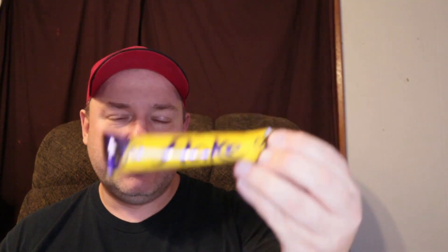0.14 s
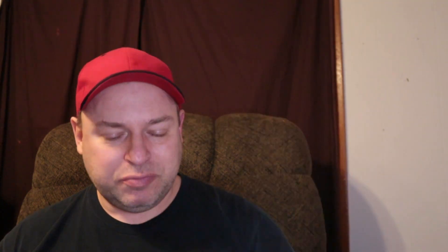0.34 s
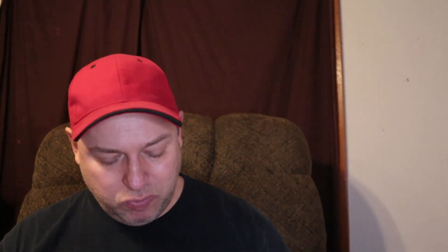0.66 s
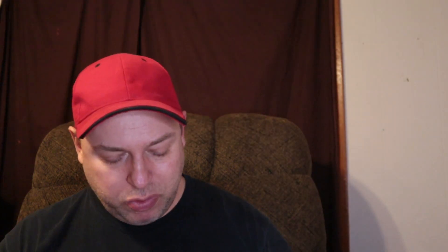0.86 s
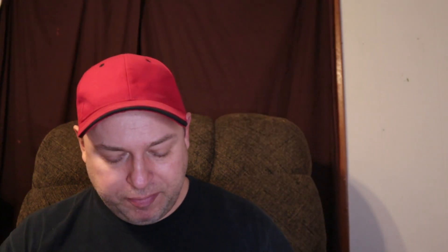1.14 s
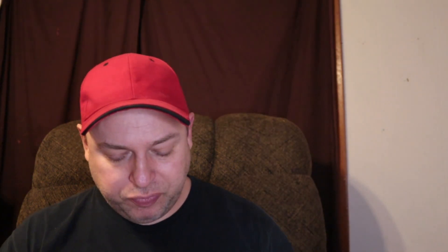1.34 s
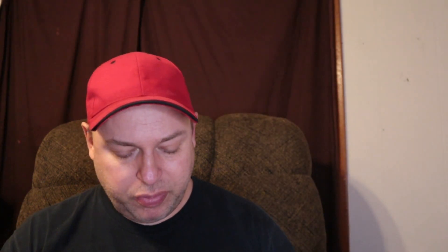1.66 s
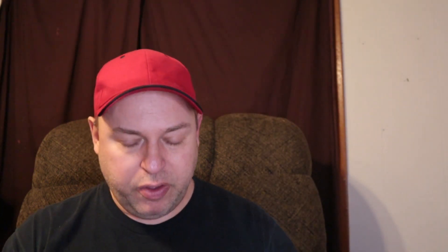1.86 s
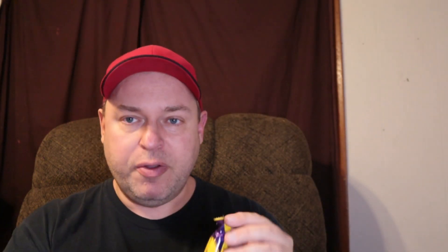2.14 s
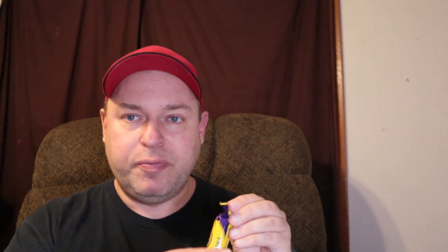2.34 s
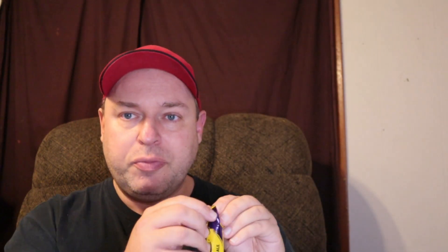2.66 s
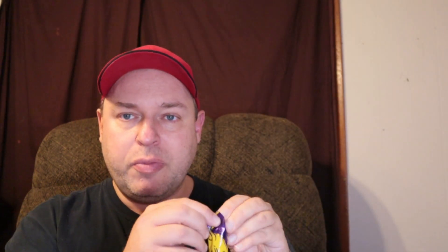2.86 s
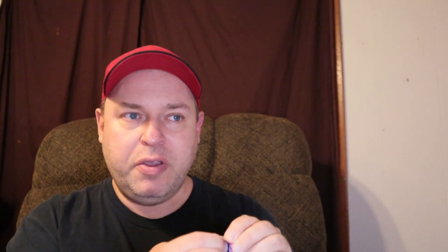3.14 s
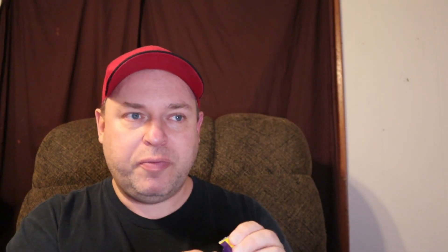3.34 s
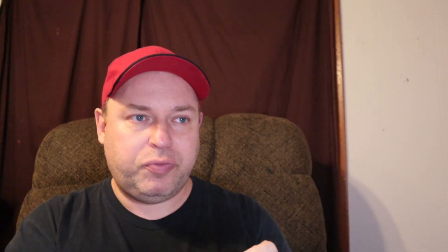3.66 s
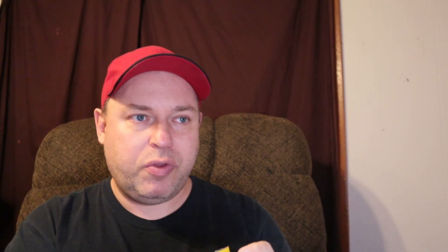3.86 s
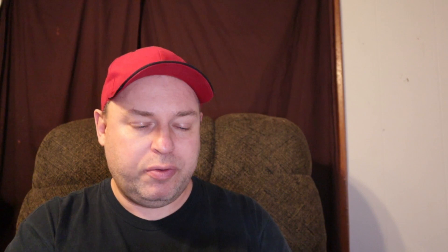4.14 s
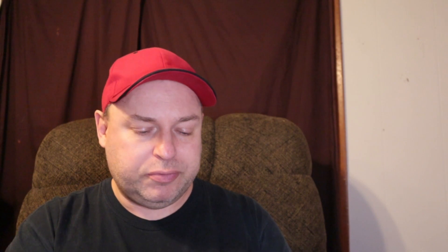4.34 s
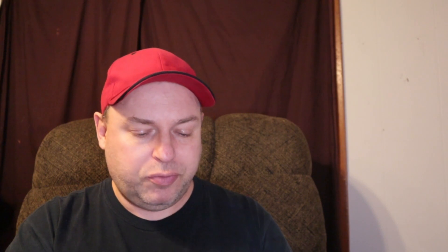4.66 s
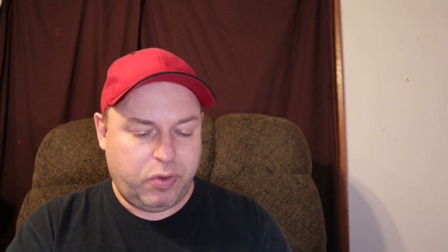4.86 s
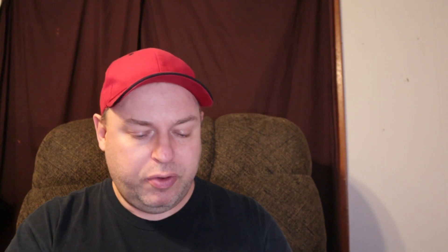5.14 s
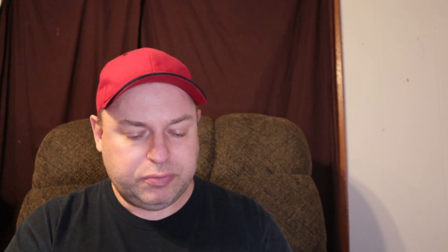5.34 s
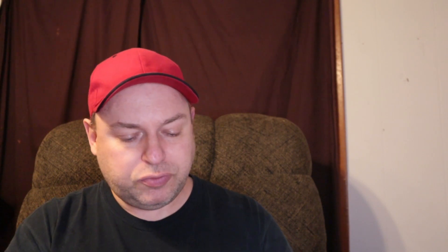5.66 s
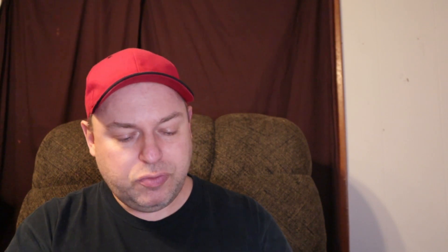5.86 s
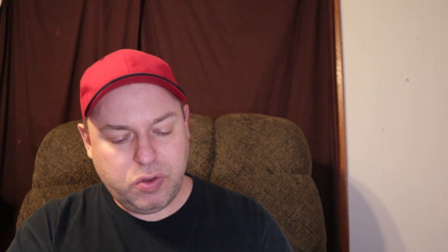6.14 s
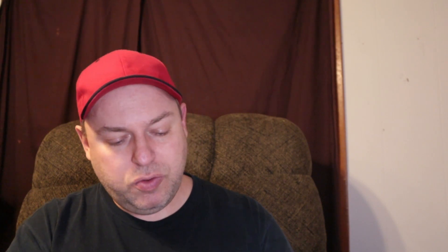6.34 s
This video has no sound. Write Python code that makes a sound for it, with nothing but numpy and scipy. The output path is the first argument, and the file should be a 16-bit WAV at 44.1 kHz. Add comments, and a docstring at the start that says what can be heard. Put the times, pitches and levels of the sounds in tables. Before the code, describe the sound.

Close, crisp crackling and rustling of a candy bar wrapper being opened by hand, over a soft appliance hum.

```python
"""Candy wrapper, close up

A thin plastic wrapper is worked open by hand near a stereo microphone in a quiet furnished room.
Creases buckle as lone snaps over tiny crackles and the hiss of sliding fingers; close surfaces and
walls echo them. Behind, over soft room rumble, an appliance's hum beats with two slower motor tones."""
import sys
import numpy as np
from scipy import signal
from scipy.fft import rfft, irfft, next_fast_len
from scipy.io import wavfile

SR = 44100
rng = np.random.default_rng(int(sys.argv[2]) if len(sys.argv) > 2 else 0)


def persist_wave(psi):
    """Save psi, clipped to +-1, as 16-bit WAV."""
    counts = np.round(np.clip(psi, -1, 1) * 32767).astype(np.int16)
    wavfile.write(sys.argv[1], SR, np.atleast_2d(counts).T)


N = 286771

# how alike both ports hear the rubbing and the wall echoes: (frequency [Hz], correlation [-1..1])
SCATTER_LIKENESS = [(1000, 1), (2500, 0.33), (6000, -0.5), (12000, -0.61)]


def from_db(db):
    return 10 ** (np.asarray(db) / 20)


def unit_rms(x):
    return x / np.sqrt(np.mean(x ** 2) + 1e-20)


def at_hz(points, hz):
    """Read a table along log frequency."""
    table_hz, values = np.transpose(points)
    return np.interp(np.log(hz), np.log(table_hz), values)


def band_noise(hz, width_hz, shape):
    """A narrow band of noise around one pitch; rms 1."""
    band = signal.butter(1, [hz - width_hz / 2, hz + width_hz / 2], "band", fs=SR, output="sos")
    return unit_rms(signal.sosfilt(band, rng.standard_normal(shape)))


def diffuse_noise(spectrum, size, likeness):
    """Noise reaching the microphone from all sides, with a given left-right likeness; rms 1."""
    hz = np.maximum(np.arange(size // 2 + 1) * SR / size, 10)
    mid, side = rfft(rng.standard_normal((2, size)))
    alike = np.clip(at_hz(likeness, hz), -1, 1)
    pair = np.sqrt(1 + alike) * mid + np.sqrt(1 - alike) * side * [[1], [-1]]
    return unit_rms(irfft(pair * from_db(at_hz(spectrum, hz)), size))


def room_tone():
    """The quiet room itself: soft rumble and faint hiss all around the microphone."""
    # spectrum of the room's air: (frequency [Hz], relative density [dB])
    spectrum = [(15, -9), (40, -22.5), (60, -10.5), (100, -14.5), (160, -16.5), (400, -16.5), (750, -21.5),
                (1400, -24.5), (2800, -28), (6000, -37.5), (10000, -53), (14000, -65)]
    # how alike both ports hear it: (frequency [Hz], correlation [-1..1])
    likeness = [(60, 1), (130, 0.91), (290, 0.65), (640, 0.044), (1400, -0.43), (6800, -0.84), (15000, 1)]
    return from_db(-53.5) * diffuse_noise(spectrum, next_fast_len(N), likeness)[:, :N]


def appliance_hum():
    """A tone at twice the mains rate beats with two slower motor tones under wavering overtones."""
    # steady mains and motor tones: (frequency [Hz], rms level [dB], phase [rad])
    tones = [(119.99, -60.4, .16), (117.51, -68.8, 1.87), (115.45, -68.6, 2.5)]
    # overtones, as narrow bands of noise: (frequency [Hz], width [Hz], rms level [dB])
    overtones = [(236.1, 9, -65), (470.6, 15, -68.5)]
    t = np.arange(N) / SR
    hum = sum(np.sqrt(2) * from_db(db) * np.sin(2 * np.pi * hz * t + phase) for hz, db, phase in tones)
    return hum + sum(from_db(db) * band_noise(hz, width, N) for hz, width, db in overtones)


def handling_db(times):
    """How hard the hands work the film: squeezes rise fast, hold and let go over a light rustle."""
    # fingers crunch the film: (time at full strength [s], hold [s], handling level [dB])
    squeezes = [(1.002, 0.064, -43.5), (1.058, 0.021, -39.5), (1.22, 0.012, -45), (1.52, 0.11, -45.5),
                (2.069, 0.0093, -30), (2.21, 0.042, -33.5), (2.428, 0.0049, -38), (2.75, 0.11, -44.5),
                (3.19, 0.063, -45.5), (3.384, 0.051, -32), (3.55, 0.0094, -35.5), (3.87, 0.027, -43.5),
                (4.061, 0.056, -39.5), (4.207, 0.11, -39), (4.52, 0.014, -42), (4.802, 0.076, -36.5),
                (4.902, 0.078, -34.5), (5.1, 0.02, -35.5), (5.328, 0.13, -34.5), (5.52, 0.026, -34.5),
                (5.68, 0.027, -41), (5.83, 0.066, -46.5), (6.133, 0.011, -45.5), (6.164, 0.025, -38),
                (6.317, 0.17, -40.5)]
    # light rustle between squeezes: (time [s], handling level [dB])
    rustle = [(0.0, -67.5), (1.0, -51), (1.5, -51), (1.8, -58.5), (2.3, -48.5), (2.7, -49), (3.0, -55.5),
              (3.6, -45), (4.3, -49), (4.48, -57.5), (4.7, -48), (5.05, -56), (5.3, -57.5), (5.6, -45),
              (6.1, -59), (6.5, -37.5)]
    rise_db_per_s, fall_db_per_s = 1195, 371
    start, hold, db = np.transpose(squeezes)[..., None]
    early, late = np.maximum(start - times, 0), np.maximum(times - start - hold, 0)
    squeeze_db = db - rise_db_per_s * early - fall_db_per_s * late
    return np.maximum(squeeze_db.max(axis=0), np.interp(times, *np.transpose(rustle)))


def finger_rub():
    """Fingers slide on the film: a soft papery hiss that swells with the handling."""
    # spectrum of the friction: (frequency [Hz], relative density [dB])
    spectrum = [(500, -19), (1200, 2.5), (2700, 9), (5000, 6.5), (9000, 3.5), (13000, -10)]
    coarse_t = np.arange(0, N + 64, 64) / SR
    level_db = np.interp(np.arange(N) / SR, coarse_t, handling_db(coarse_t)) - 5
    return from_db(level_db) * diffuse_noise(spectrum, next_fast_len(N), SCATTER_LIKENESS)[:, :N]


def buckle(times, peak_db, fold_hz, fold_q, boom_db, spread_db, detune):
    """A buckling crease kicks each patch of film differently; the crumpled shape shifts their tuning."""
    # patches of film that ring: (frequency [Hz], relative level [dB], time to fall 60 dB [s])
    patches = [(480, -16, .011), (1100, -2, .012), (1450, -2, .009), (1850, 1, .006), (2700, -1, .003),
               (3900, 1, .0022), (5300, -1, .0016), (7500, 0, .0015), (10500, 2, .001)]
    hz, patch_db, t60 = np.transpose(patches)
    low = hz < 1500   # low patches boom, the rest crack
    scatter = rng.standard_normal((len(times), 2, len(patches)))
    kick = from_db(patch_db + spread_db * scatter[:, 0])
    kick[:, 0] *= from_db(.8 * (boom_db + 14))   # a heavy boom is also a deep one
    tuned_hz = hz * np.exp(detune * scatter[:, 1])
    t = np.arange(640) / SR
    rings = np.sin(2 * np.pi * tuned_hz[..., None] * t) * from_db(-60 * t / t60[:, None])
    crack, boom = (np.einsum("em,emt->et", kick * part, rings) for part in (~low, low))
    # the fold is a resonator of its own pitch and radiates little below it
    bins_hz = (np.arange(len(t) // 2 + 1) + 1e-3) * SR / len(t)
    ratio = 1j * bins_hz / fold_hz[:, None]
    fold = ratio / (1 + ratio) / (1 + fold_q[:, None] * (ratio + 1 / ratio))
    crack = irfft(rfft(crack) * fold)
    boom *= (from_db(boom_db) * crack.std(axis=1) / boom.std(axis=1))[:, None]
    pops = (crack + boom) * from_db(peak_db)[:, None] / abs(crack).max(axis=1, keepdims=True)
    return place_with_echoes(times, pops)


def place_with_echoes(times, pops):
    """Set each pop in stereo with echoes off hands, chest and chair, new each time as the hands move."""
    echo_db, echo_t60_s, lag_spread_s = -4, .008, 2e-5
    count, size = pops.shape
    t = np.arange(size) / SR
    echoes = rng.standard_normal((count, 2, size)) * from_db(-60 * t / echo_t60_s) * (t > .0009)
    lowpass = signal.butter(2, 1800, fs=SR, output="sos")
    echoes += signal.sosfilt(lowpass, echoes[:, ::-1])   # alike at both ports only in the lows
    echoes *= from_db(echo_db) / np.sqrt(np.mean(np.sum(echoes ** 2, axis=2)))
    # creases lie at scattered angles, so each reaches one port first
    lag_s = lag_spread_s / 2 * rng.standard_normal((count, 1, 1)) * np.array([[1], [-1]])
    hz = np.arange(size + 1) * SR / (2 * size)
    direct = np.exp(-2j * np.pi * hz * lag_s)
    heard = irfft(rfft(pops, 2 * size)[:, None] * (direct + rfft(echoes, 2 * size)))
    samples = (np.round(times * SR).astype(int)[:, None] + np.arange(2 * size)).ravel()
    return np.array([np.bincount(samples, heard[:, side].ravel(), N)[:N] for side in (0, 1)])


def crackle(creases):
    """Tiny creases give way at random, most of them faint, louder and denser with the handling."""
    dense_db = -45   # below this handling level the crackles thin out
    when, size, pitch, sharpness, depth = rng.random((5, creases))
    times = when * N / SR
    level_db = handling_db(times)
    gives_way = rng.random(creases) < from_db(.5 * (level_db - dense_db))
    size_db = np.minimum(-5.5 * np.log(size), 11.5)
    peak_db = np.where(gives_way, level_db + size_db + 3.03, -np.inf)
    return buckle(times, peak_db, fold_hz=2300 * 2 ** (2.1 * pitch), fold_q=3 * sharpness,
                  boom_db=-20.5 + 8 * depth, spread_db=3.5, detune=.12)


def snaps():
    """The creases that buckle loudly enough to stand alone."""
    # loud creases: (time [s], crack peak at the film [dB], fold pitch [Hz], fold Q, boom re crack [dB])
    creases = [(0.2148, -28.5, 3100, 5.3, -34), (0.6604, -28.5, 5880, 0.52, -25),
               (0.721, -29.5, 6700, .9, -27.5), (0.7457, -24, 7700, 1, -30), (1.033, -24, 4770, 1, -3.5),
               (1.0703, -21, 3000, 0.9, -10.5), (1.3859, -21.5, 2480, 0.55, -31),
               (1.4264, -21.5, 6560, 0.85, -4), (1.505, -22, 6690, 1.9, -35.5),
               (1.5155, -12.5, 4300, 0.84, -11.5), (1.583, -22, 4970, 1, -31),
               (1.6072, -19, 4640, 3.3, -33), (1.678, -26.5, 2900, 2.74, -29),
               (1.933, -15.5, 8900, 1.4, -11), (1.9802, -25, 2360, 0.46, -30),
               (1.9995, -24, 3620, 1.5, -27), (2.0703, -19.5, 3540, 1.3, -27), (2.0787, -28, 3570, .8, -18),
               (2.0992, -11, 2780, 0.24, -22), (2.18, -13.5, 5550, 0.24, -34),
               (2.1927, -10, 7950, 0.43, -18), (2.218, -28, 3500, 0.55, 6.5), (2.2238, -16, 4400, 0.6, -24),
               (2.2472, -23, 5500, 1.2, -29), (2.251, -18, 3000, 6.7, -27), (2.3124, -14, 4900, 0.68, -30),
               (2.321, -16, 3900, 1.7, -9), (2.3268, -18, 7500, 0.41, -28),
               (2.3605, -15.5, 9300, 1.56, -32), (2.4211, -11, 2720, 0.33, -15),
               (2.4222, -20, 2000, 3, -19), (2.5197, -18, 4345, 0.16, -17.5), (2.54, -20.5, 7360, 1.7, -22),
               (2.5959, -16, 4350, 0.92, -26), (2.624, -14, 8550, 1.1, -38), (2.65, -17.5, 5040, 1.1, -34),
               (2.658, -20.5, 7000, 1.7, -34), (2.6897, -16.5, 5140, 1.2, -33),
               (2.7244, -14, 6320, 1.5, -41), (2.7512, -20, 4440, 4, -21), (2.755, -24, 7450, 2, -32),
               (2.7877, -11.5, 8700, 5.5, -41), (2.806, -20, 3500, 1.1, -11), (2.8145, -22, 5000, 0.44, -7),
               (2.8271, -10.5, 4730, 0.62, -21), (2.834, -21.5, 7500, 1.2, -32),
               (2.861, -16, 5620, 0.52, -33), (2.8976, -19.5, 6590, 0.52, -28),
               (2.9836, -28, 4076, 1.5, -27), (3.06, -16, 4630, 5.3, -24), (3.184, -18, 5060, 2.1, -17),
               (3.192, -20.5, 5900, 0.8, -10), (3.2293, -16, 7560, 3.1, -20), (3.313, -9, 4640, 1.4, -12.5),
               (3.387, -13, 4200, 2.7, -21), (3.403, -18, 5090, 0.89, -30), (3.4229, -9, 5700, 2.1, -16.5),
               (3.45, -12.5, 7100, 1.7, -34.5), (3.477, -12, 4300, 0.22, -26),
               (3.4925, -17, 6050, 2.4, -9.5), (3.513, -21, 7000, 2.4, -30), (3.5443, -16, 1900, 0.48, -13),
               (3.546, -13.5, 3740, 1.32, -9), (3.5626, -19, 3920, 1.3, -20), (3.5675, -16, 5200, 1.5, -26),
               (3.571, -16, 7600, 0.8, -30), (3.6105, -17.5, 6500, 0.64, -28),
               (3.6987, -16, 4540, 1.5, -25), (3.708, -2.5, 4900, 0.89, -26),
               (3.7225, -9.5, 5200, 0.67, -15), (3.7413, -10, 6110, 2.2, -28), (3.749, -18, 6500, 1.6, -30),
               (3.7675, -9, 8020, 0.71, -20), (3.775, -13, 7000, 0.91, -32),
               (3.8524, -8, 5300, 0.68, -17.5), (3.907, -24, 3600, 0.27, 10.5),
               (3.9194, -10, 2890, 0.26, -18), (3.955, -27, 2500, 0.55, 2), (3.99, -21, 3900, 0.61, -9),
               (4.0253, -18.5, 4700, 0.31, -8), (4.0576, -7.5, 5000, 0.21, -12),
               (4.071, -25, 3010, 1.1, -15.5), (4.1086, -15, 5800, 1.4, -16),
               (4.1502, -18.5, 4120, 0.3, -8), (4.191, -12.5, 5100, 0.85, -15),
               (4.2102, -14, 3000, 0.29, -3), (4.216, -5.5, 3630, 1.04, -10.5),
               (4.2505, -17.5, 4700, .7, -6), (4.2623, -13, 4000, 0.46, -5), (4.2643, -11, 3480, 0.68, -7),
               (4.2662, -10.5, 4960, 0.48, -22), (4.271, -13.5, 2000, 0.54, -11),
               (4.3005, -9, 3500, 0.43, -11.5), (4.307, -13, 5440, 0.5, -23), (4.3345, -20, 5500, 1.5, -25),
               (4.3397, -9, 5000, 0.34, -9.5), (4.406, -23, 2110, 1.6, -20),
               (4.4203, -14.5, 6800, 0.24, -8), (4.5036, -19.5, 3205, 2.6, -12),
               (4.525, -16.5, 2140, 0.35, -40), (4.532, -20.5, 1850, 0.95, -10),
               (4.544, -19.5, 5000, 0.78, -8), (4.577, -13, 4460, 0.49, -12), (4.751, -16, 8300, 1.5, -28),
               (4.7651, -13, 5950, 0.46, -4.5), (4.7832, -17.5, 4300, 1.02, -9),
               (4.8016, -14, 1930, 0.82, -5.5), (4.808, -10, 6540, 1.1, -2), (4.824, -14.5, 6000, 0.73, -6),
               (4.851, -9.5, 6100, 1.6, -19), (4.858, -14, 8000, 2, -30), (4.873, -23, 2000, 1.1, -1.5),
               (4.9025, -14, 4230, 2.7, -16), (4.91, -13, 3900, 1.2, -17), (4.9118, -13.5, 2790, 1.4, -7),
               (4.937, -14.5, 4170, 3.3, -6), (4.942, -11, 6000, .4, -20), (4.947, -9.5, 7460, .8, -30),
               (4.954, -10, 8000, 1, -28), (4.9674, -13.5, 7000, 1.1, -21), (4.9733, -6.5, 4800, 0.53, -15),
               (4.975, -21, 2250, 1.2, -1.5), (5.097, -18, 5350, 2.4, -12), (5.102, -21, 2500, 0.92, -6.5),
               (5.1087, -18, 4750, 1.1, -7), (5.1936, -19.5, 4330, 2, -14), (5.2086, -16, 7600, 1.3, -33),
               (5.222, -22, 3020, 1.1, -18), (5.321, -14.5, 4000, 0.27, -10), (5.3343, -11, 5600, 1.4, -21),
               (5.338, -11, 6000, 0.4, -8.5), (5.346, -16.5, 4500, 0.9, -8), (5.365, -20, 4000, 1.2, -20),
               (5.3745, -20.5, 4500, 0.74, -24), (5.3805, -18, 7500, 1.7, -19),
               (5.387, -10.5, 7500, 0.67, -30), (5.391, -7.5, 7350, 2.5, -22), (5.412, -14, 5360, 0.5, -10),
               (5.4131, -13.5, 2270, 0.67, -17), (5.433, -8, 7100, 3.7, -9), (5.4939, -9.5, 6400, 1.6, -16),
               (5.515, -15, 4975, 0.99, -16), (5.5261, -12.5, 7505, 1.58, -22), (5.55, -13, 7900, 1.3, -34),
               (5.595, -17, 7800, 2.1, -39), (5.6692, -9, 3470, 0.063, -33),
               (5.701, -19.5, 4280, 0.53, -10), (5.8238, -21.5, 4330, 0.8, -16),
               (5.852, -19.5, 7370, 1, -11.5), (5.9463, -15, 8050, 1, -18), (6.0088, -22.5, 4270, 0.29, -7),
               (6.155, -23, 5300, 1.06, -20), (6.1909, -14.5, 4700, 0.3, -14),
               (6.319, -21, 5560, 0.88, -9.5), (6.334, -23, 2500, 0.69, -5),
               (6.385, -14.5, 4280, 0.55, -24), (6.3902, -9.5, 6100, 0.75, -20),
               (6.4475, -12, 6810, 1.2, -14), (6.4536, -13, 4660, 0.6, -21), (6.467, -17, 7000, 1.2, -30),
               (6.477, -14.5, 5910, 1.7, -14)]
    return buckle(*np.transpose(creases), spread_db=2.5, detune=.09)


def air_pockets():
    """While a hand cups the film, the pocket of air colours the rubbing with its own pitch."""
    # cupped moments: (start [s], end [s], pitch [Hz], rms level at the film [dB])
    pockets = [(1.94, 2.06, 1680, -58.5), (2.057, 2.19, 1480, -52), (2.414, 2.48, 1950, -47.5)]
    width_hz, fade_s = 380, .014
    t, sound = np.arange(N) / SR, 0
    for start, end, hz, db in pockets:
        fade = np.clip(np.minimum(t - start, end - t) / fade_s, 0, 1)
        sound = sound + from_db(db) * fade * band_noise(hz, width_hz, (2, N))
    return sound


def at_microphone(wrapper):
    """The wrapper's sound reaches the left port a little early, but shaded."""
    # shading of the left port: (frequency [Hz], gain [dB])
    shading = [(700, 1.5), (1300, -2.5), (2400, -5.5), (4400, -2), (8000, 1)]
    lead_s = 2.5e-5
    size = next_fast_len(N)
    hz = np.maximum(np.arange(size // 2 + 1) * SR / size, 10)
    left_response = from_db(at_hz(shading, hz)) * np.exp(2j * np.pi * hz * lead_s)
    left = irfft(rfft(wrapper[0], size) * left_response, size)[:N]
    return np.array([left, wrapper[1]])


def wall_echoes(direct):
    """The walls of the furnished room return a short, soft, slightly duller wash."""
    # colour of the reflections: (frequency [Hz], relative level [dB])
    colour = [(400, -8.0), (2000, -7.5), (12000, -10)]
    level_db, t60_s, first_echo_s = -10.5, .1, .006
    t = np.arange(SR // 2) / SR
    tail = diffuse_noise(colour, len(t), SCATTER_LIKENESS) * from_db(-60 * t / t60_s) * (t > first_echo_s)
    tail /= np.sqrt(np.sum(tail ** 2) / 2)
    return from_db(level_db) * signal.fftconvolve(direct, tail, axes=1)[:, :N]


def scene():
    """The wrapper close to the microphone; wall echoes, appliance and room tone behind it."""
    wrapper = snaps() + crackle(creases=3000) + finger_rub() + air_pockets()
    bass_cut = signal.butter(2, 600, "high", fs=SR, output="sos")   # a small sheet radiates no bass
    direct = at_microphone(signal.sosfilt(bass_cut, wrapper))
    return direct + wall_echoes(direct) + appliance_hum() + room_tone()


def record(dry):
    """The microphone rolls off above 11 kHz, and the top is cut steeply by 16.6 kHz."""
    dull = signal.sosfilt(signal.butter(4, 11000, fs=SR, output="sos"), dry)
    return signal.sosfilt(signal.cheby2(20, 60, 16600, fs=SR, output="sos"), dull)


dry = scene()
out = record(dry)
persist_wave(out)
```